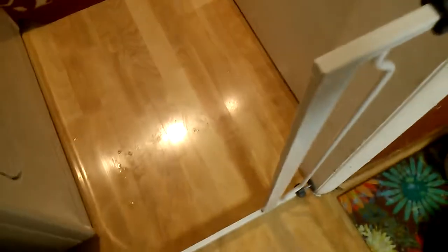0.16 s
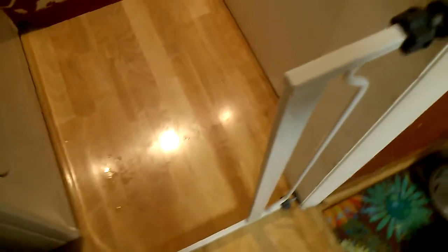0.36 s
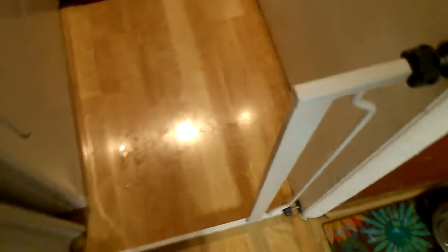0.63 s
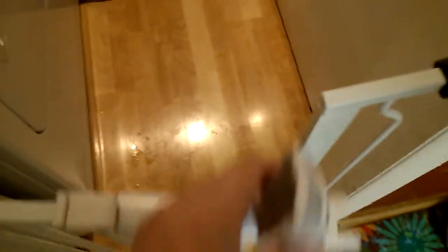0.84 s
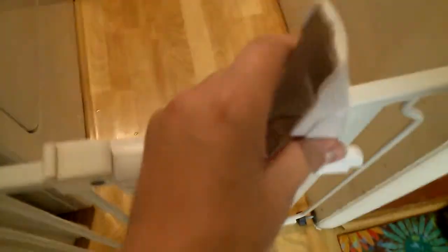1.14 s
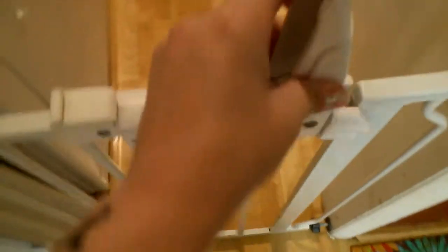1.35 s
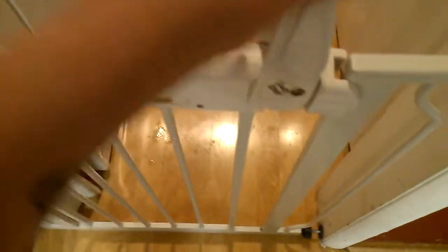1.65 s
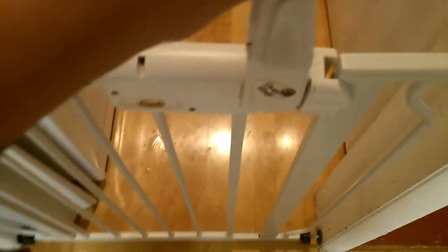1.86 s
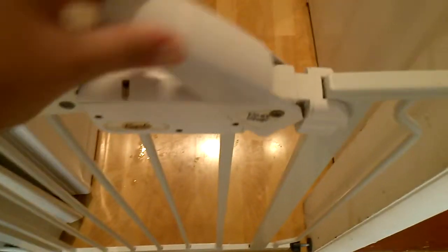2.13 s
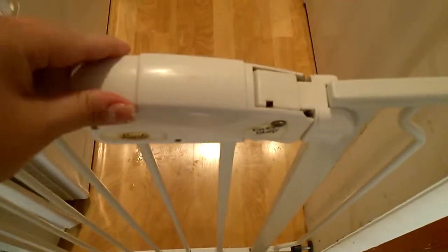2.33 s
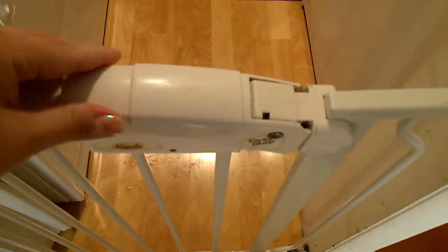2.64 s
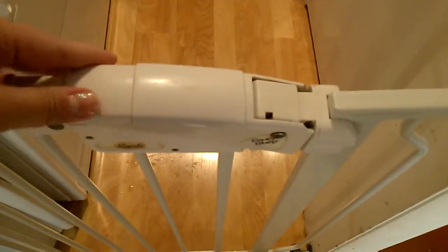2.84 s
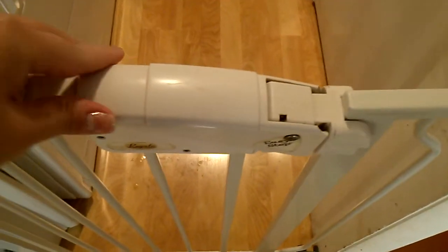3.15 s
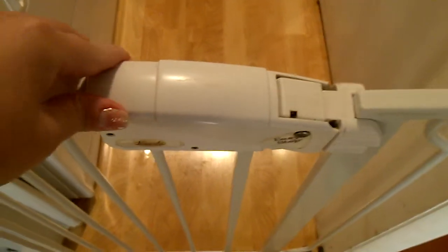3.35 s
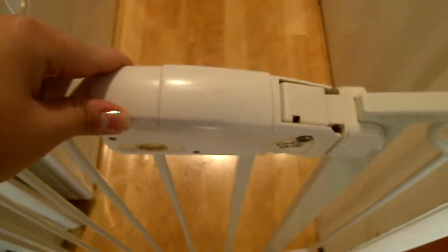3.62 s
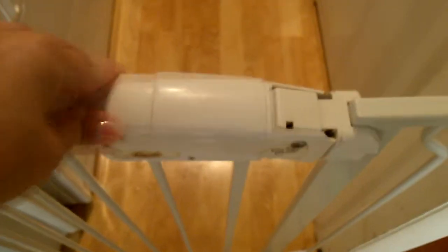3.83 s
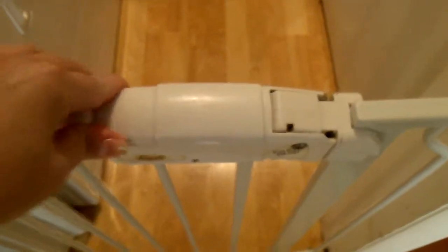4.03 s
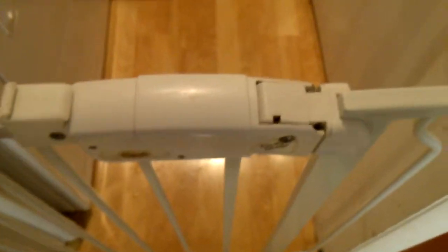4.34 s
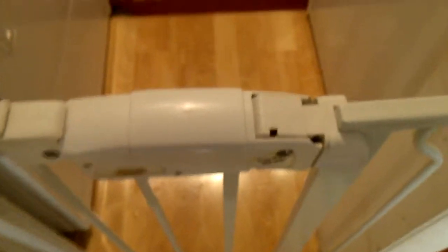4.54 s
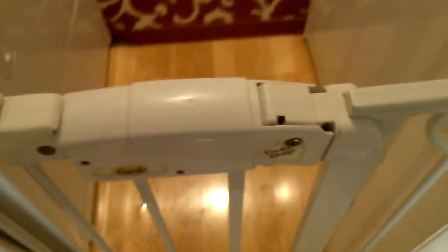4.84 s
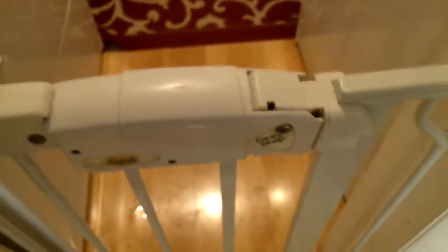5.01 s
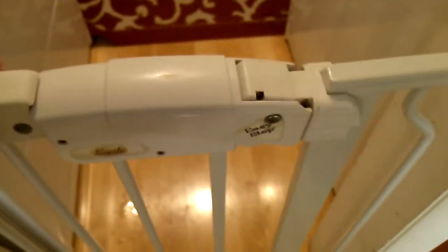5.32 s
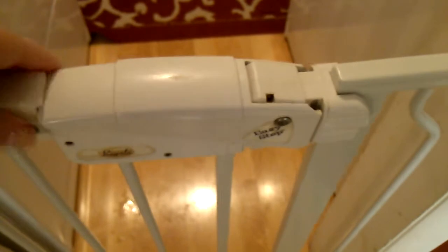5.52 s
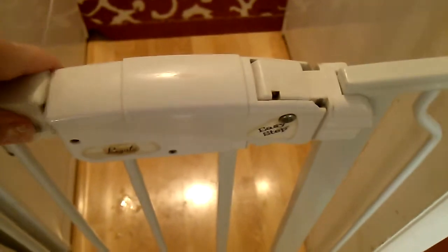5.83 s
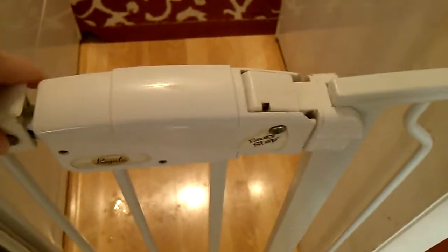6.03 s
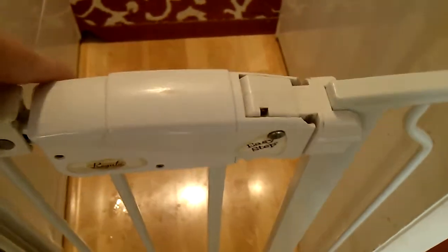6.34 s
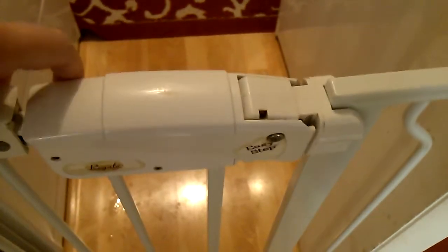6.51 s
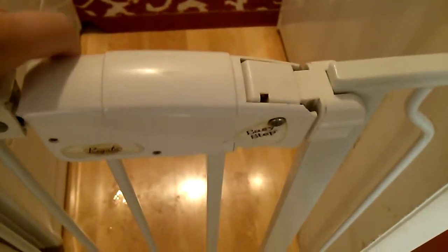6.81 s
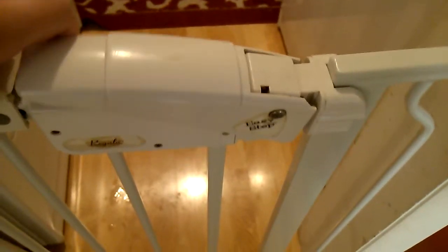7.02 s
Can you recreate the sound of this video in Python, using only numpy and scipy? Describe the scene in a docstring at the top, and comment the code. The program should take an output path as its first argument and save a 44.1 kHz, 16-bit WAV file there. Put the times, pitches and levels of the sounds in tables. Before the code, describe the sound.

Close to a phone microphone in a hallway, a safety gate rattles shut in a burst of hard plastic cracks and short metallic rings. Separate clacks follow as the handle is worked, then one loud, rasping snap shakes the frame. After a lull, the latch clicks and knocks unevenly, with a tiny squeak. A slight room echo trails each hit, and quiet hiss and electrical hum lie underneath.

```python
"""Baby gate in a hallway

A hand shuts the gate and works its plastic handle and latch, close to a phone. Each knock is a short
crack that rings the steel bars; rubbing and rattling parts do the same with dense ticks. The frame
shakes after heavier knocks and the latch squeaks. The hallway adds a short tail over hiss and mains hum."""
import sys
import numpy as np
from scipy import signal
from scipy.io import wavfile
from scipy.ndimage import uniform_filter1d

SR = 44100
rng = np.random.default_rng(int(sys.argv[2]) if len(sys.argv) > 2 else 0)


def log_audio(samples):
    """Write samples as a 16-bit WAV file to the path given in sys.argv[1]."""
    # one column per channel
    frames = np.atleast_2d(samples).T
    # limit to full scale, then quantise
    limited = np.clip(frames, -1, 1)
    pcm = np.round(limited * 32767).astype(np.int16)
    wavfile.write(sys.argv[1], SR, pcm)


N = 316197

# modes of the steel bars and housing: pitch_hz, level_db, free_t60_s
GATE_MODES = [(680, -29, .1), (816, -6, .13), (867, -14.5, 0.11), (1090, -3, 0.033), (1482, 5, 0.16),
              (1768, 0, 0.11), (1890, -28.5, .16), (2200, -22.5, 0.18), (2177, 1.5, 0.54), (2182, 0, 0.49),
              (2270, -14, 0.73), (2550, -27.5, 0.39), (2370, 7.5, 0.22), (2590, -8, 1), (2810, 9, 0.23),
              (2790, -3.5, 0.11), (3020, -10, 0.64), (3260, -48, 0.12), (3370, -32, .3), (3760, -44, 0.27),
              (3995, -1.5, 0.11), (4480, -4, 0.15), (4640, -21, 0.13), (5220, -23, 0.14),
              (6090, -0.5, 0.27), (5935, -17, 0.18), (5800, -12, 0.2), (6000, -17, .13)]
MODE_HZ = np.transpose(GATE_MODES)[0]
HOUSING_MODES = MODE_HZ < 1300


def amp(db):
    return 10 ** (np.asarray(db) / 20)


def unit_rms(x):
    return x / np.sqrt(np.mean(x ** 2) + 1e-20)


def unit_peak(x):
    return x / abs(x).max()


def curve_at(points, hz):
    point_hz, value = np.transpose(points)
    return np.interp(np.log(hz + 1), np.log(point_hz + 1), value)


def add(mix, start_s, sound):
    part = mix[round(start_s * SR):][:len(sound)]
    part += sound[:len(part)]


def band(x, lo_hz, hi_hz):
    return signal.sosfilt(signal.butter(2, [lo_hz, hi_hz], "band", fs=SR, output="sos"), x)


def resonate(x, hz, width_hz):
    """One complex pole, unity gain at resonance."""
    radius = np.exp(-np.pi * width_hz / SR)
    return 2 * signal.lfilter([1 - radius], [1, -radius * np.exp(2j * np.pi * hz / SR)], x).real


def room_tone():
    """Hiss with faint drifting patches, plus wavering mains hum."""
    # hiss spectrum: freq_hz, density_db
    hiss_spectrum = [(15, -64), (25, -29), (52, -1), (124, -6.5), (147, 0), (182, -11), (323, -9),
                     (356, -11.5), (534, -12), (862, -11.5), (2470, -19.5), (3290, -19), (6740, -29.5),
                     (7600, -25), (9880, -58), (16700, -120)]
    # hiss envelope: time_s, level_db
    hiss_envelope = [(0, -50), (1.2, -46.5), (2.3, -45.5), (2.7, -50.5), (3.8, -49), (4.6, -49.5),
                     (5.4, -50.5), (6.1, -50), (7.17, -49)]
    # mains hum: pitch_hz, level_db, waver_ratio
    mains = (119.5, -59.5, 0.36)
    hum_hz, hum_db, waver_ratio = mains
    t, bin_hz = np.arange(N) / SR, np.fft.rfftfreq(1024, 1 / SR)
    real, imag, patches = rng.standard_normal((N // 256 + 5, 513, 3)).T
    patch_db = 1.6 * unit_rms(uniform_filter1d(uniform_filter1d(patches, 14, 0), 12, 1))
    spectra = (real + 1j * imag) * amp(curve_at(hiss_spectrum, bin_hz)[:, None] + patch_db)
    hiss = signal.istft(spectra, nperseg=1024, noverlap=768)[1][:N]
    hiss_db = np.interp(t, *np.transpose(hiss_envelope)) - 0.5
    waver = unit_rms(resonate(rng.standard_normal(N), hum_hz, width_hz=5.1))
    hum = np.sin(2 * np.pi * hum_hz * t) + waver_ratio * waver
    return amp(hiss_db) * unit_rms(hiss) + amp(hum_db) * unit_rms(hum)


def bars(weights_db, t60_scale, length_s=.3):
    """Tap response of three nearly alike bars, modes weighted by where the tap lands."""
    hz, db, t60_s = np.float32(GATE_MODES).T[:, :, None]
    t = np.arange(round(length_s * SR), dtype=np.float32) / SR
    phase = 2 * np.pi * hz * t
    detuned = sum(np.sin(phase * np.float32(1 + 0.018 * rng.standard_normal(hz.shape))) for _ in range(2))
    decay = np.exp(-6.9078 * t / (t60_s * t60_scale))
    return unit_peak(amp(db[:, 0] + weights_db) @ (decay * (np.sin(phase) + 1.65 * detuned)))


def knocks():
    """A crack in three bands with two plastic tones; its onset rings the bars."""
    # blows: start_s, level_db, pitch_hz, edge_hz, hollow_db, edge_db, ring_db (last three re level_db)
    blows = [(0.4018, -47.5, 1220, 3970, -9, 13, -14), (0.481, -40.5, 2210, 3760, -12, 2.5, -3),
             (0.587, -27, 3250, 3600, -33, 1.5, -25), (0.815, -32, 2940, 5200, -8, -3, -5),
             (1.0515, -36.5, 1190, 6100, -16, 4, -4), (1.1389, -7, 2330, 3950, -8.5, 3, -11),
             (1.1469, -6, 1550, 4300, -3.5, -31, -16), (1.1974, -29.5, 2140, 5580, 11, -8, -9),
             (1.228, -7.5, 2290, 4180, -5.5, -9.5, -17), (1.2843, -21.5, 1300, 4430, -7, 3, -3),
             (1.3232, -24.5, 1420, 3860, 3.5, -5, -7), (1.339, -36, 1860, 6200, 9, 10, 1),
             (1.3718, -5.5, 2130, 5120, -3, 9, 3), (1.3844, -4, 2170, 5070, -13, -14, -2.5),
             (1.402, -6.5, 2200, 6020, -11, -23, -15), (1.423, -7, 2110, 6000, -0.5, 5, -19),
             (1.4355, -6, 2140, 6160, -9.5, -16, -10), (1.4524, -11.5, 2150, 3580, -10, -7, -4),
             (1.8693, -26.5, 2240, 5960, -1, 6.5, 1), (1.8862, -14.5, 2010, 3820, -4, -2.5, -3),
             (2.15, -30, 2070, 3850, -23, -4, -22), (2.3519, -1, 2870, 4260, -17.5, 1, -3),
             (2.362, -9.5, 2750, 4300, -11.5, 0, -13), (2.7835, -43.5, 1470, 3440, 10.5, -1, -16),
             (3.0758, -32.5, 2360, 5680, 5, -5, -3), (3.0872, -30, 1770, 3740, 9, -8, -10),
             (3.2558, -14, 2240, 3400, -15.5, -6.5, -2), (3.2875, -34.5, 2820, 3670, 10, -22, -17),
             (3.4488, -42.5, 1410, 5350, -18, 1, 0), (3.563, -45, 1230, 3990, 2, -1, -6),
             (3.608, -35, 1250, 6670, 8, -5, -11), (3.6552, -37.5, 1430, 4080, 3, -17, -4),
             (3.7022, -27, 1460, 3660, 1, -18, -6), (3.7177, -29.5, 1480, 3700, 11, 1.5, -1),
             (3.7965, -46, 2170, 3960, -14, -20, 6), (3.9027, 4, 2650, 4200, -11, 0, -7),
             (4.4214, -46, 2150, 5730, 6, 5.5, 5), (4.4633, -45, 2150, 5440, -13, 3, -4),
             (4.6117, -37.5, 2140, 5820, -11, 4.5, -22), (5.1045, -50.5, 2930, 5970, -12, 12.5, 0),
             (5.4269, -29, 2400, 5530, 2, -4, -1.5), (5.5448, -33.5, 1280, 6240, -14, 0, -11),
             (5.6051, -28, 1800, 4010, -0.5, -21, -19), (5.7028, -21, 2330, 3360, -30, 6.5, 8),
             (5.7131, -15.5, 2360, 6060, -14, 2, 2.5), (5.7589, -25, 2330, 6000, 0.5, -2, 2),
             (5.803, -27, 1990, 3820, 4, -16, -6), (5.8574, -35, 2150, 3500, -1.5, -18, -11),
             (5.9045, -31, 1350, 5700, -17, -0.5, 1), (5.9178, -23, 1710, 5770, -0.5, 1, -8),
             (5.946, -17, 2550, 3500, -33, 0.5, -8), (5.9889, -21, 1230, 3860, -1, -3.5, -21),
             (6.0163, -20.5, 1230, 5710, -18, -8, -17), (6.0804, -13.5, 2850, 3300, -8.5, -3, -2.5),
             (6.0872, -17, 2260, 5800, -8, -4.5, 4), (6.3079, -34, 2240, 4160, -4.5, -8, 6),
             (6.4278, -41.5, 2330, 3750, -26, -9, 7.5), (6.552, -15, 1440, 5630, -8, -5, -14),
             (6.5754, -23.5, 1500, 4000, -0.5, -19, -12), (6.8219, -24, 1430, 3500, -10, -12, -18),
             (6.8614, -27.5, 2660, 3670, -7, 2, -15), (6.8914, -10.5, 1470, 3720, -11, -13, -12),
             (6.955, -38, 1460, 3700, -5, -2, -8), (7.0695, -46.5, 1250, 4000, 11, 9, -16),
             (7.1187, -37, 1490, 3430, -4.5, -2, -5)]
    # air in the plastic housing: pitch_hz, width_hz, level_db
    air_modes = [(775, 116, 1.5), (449, 65, -5)]
    rise_s, spike_gain, push_samples = .0016, 1.81, 400
    out, t = np.zeros(N), np.arange(4096) / SR
    for start_s, level_db, pitch_hz, edge_hz, hollow_db, edge_db, ring_db in blows:
        burst = rng.standard_normal(len(t)) * (1 - np.exp(-t / rise_s))
        burst += spike_gain * signal.unit_impulse(len(t))
        crack_t60_s = .045 * amp(0.33 * ring_db)  # more ring, longer crack
        crack = burst * amp(-60 * t / crack_t60_s)
        tock = unit_peak(band(crack, 910, 3840) + 3.8 * resonate(crack, pitch_hz, 360))
        edge = unit_peak(band(crack, 3250, 13400) + 2.2 * resonate(crack, edge_hz, 270))
        dull = band(burst * amp(-60 * t / 0.061), 400, 1520)
        air = sum(amp(db) * resonate(dull, hz, width_hz) for hz, width_hz, db in air_modes)
        hollow = unit_peak(dull + air)
        add(out, start_s, amp(level_db) * (tock + amp(hollow_db) * hollow + amp(edge_db) * edge))

        # the struck place favours modes near its two pitches
        near_pitch = amp(-40 * abs(np.log2(MODE_HZ / pitch_hz)))
        near_edge = amp(edge_db - 4.5 - 60 * abs(np.log2(MODE_HZ / edge_hz)))
        weights_db = 20 * np.log10(near_pitch + near_edge + 0.34) + .5 * hollow_db * HOUSING_MODES
        weights_db += 2 * rng.standard_normal(len(MODE_HZ))
        onset = crack[:push_samples]
        push = 0.48 * onset / np.linalg.norm(onset) + signal.unit_impulse(push_samples)
        t60_scale = max(.7 - .033 * max(level_db + 15, 0), .1)  # harder blows are gripped harder
        ring = signal.fftconvolve(push, bars(weights_db, t60_scale, length_s=.22))
        add(out, start_s, amp(level_db + ring_db) * unit_peak(ring))
    return out


def rubs():
    """Dense uneven ticks, heard directly, through the rubbed part and through the bars."""
    # strokes: start_s, length_s, first_db, last_db, pitch_hz, hollow_db, edge_db, ring_db
    # (last three re stroke level)
    strokes = [(0.805, 0.46, -46, -54, 2410, -4, 3, 1), (1.7, 0.22, -51, -49, 2240, -6, 8.5, 2),
               (1.94, 0.24, -42, -44.5, 2170, -14, 1.5, 10), (2.21, 0.18, -46.5, -37, 1720, 2, 1, 11),
               (3.5, 0.066, -55, -47, 2100, 4, -10, 5), (3.609, .02, -47, -55, 1960, 17, -4, 9),
               (3.905, 0.097, -9.5, -13.5, 2400, 2, -6, 2), (5.545, .04, -47, -52, 1650, 11, -4, 5),
               (5.915, 0.035, -24.5, -30.5, 2200, 2, -3, 3), (6.012, 0.019, -24, -35.5, 2230, 6.5, -14, 5)]
    ticks_per_s, rise_s, fade_db_per_s, bars_db = 5000, .01, 199.5, -18
    out, t = np.zeros(N), np.arange(SR // 2) / SR
    for start_s, length_s, first_db, last_db, pitch_hz, hollow_db, edge_db, ring_db in strokes:
        level_db = np.interp(t, [0, length_s], [first_db, last_db])
        level_db -= fade_db_per_s * np.maximum(t - length_s, 0)
        ticks = rng.standard_normal(len(t)) * amp(1.3 * rng.exponential(1, len(t)))
        ticks *= rng.random(len(t)) < ticks_per_s / SR
        ticks = unit_rms(ticks) * amp(level_db) * np.minimum(t / rise_s, 1)
        hollow = amp(hollow_db) * band(ticks, 370, 1900)
        edge = amp(edge_db) * band(ticks, 2710, 8300)
        part_tone = amp(ring_db) * resonate(ticks, pitch_hz, 140)
        add(out, start_s, band(ticks, 1350, 4080) + hollow + edge + part_tone)
        # light ticks hardly move the housing
        ring = bars(-9 * HOUSING_MODES - 22 * abs(np.log2(MODE_HZ / pitch_hz)), t60_scale=0.55)
        add(out, start_s, amp(ring_db + bars_db) * signal.fftconvolve(ticks, ring / np.linalg.norm(ring)))
    return out


def frame_thuds():
    """The frame shakes after heavier knocks: low noise that swells and dies."""
    # frame shakes: start_s, peak_db, rise_s
    shakes = [(1.14, -29.5, .01), (1.228, -33.5, .01), (1.32, -36, 0.0055), (1.372, -27, 0.0087),
              (1.423, -27, 0.018), (1.875, -36, 0.012), (2.352, -34.5, 0.0033), (2.8, -49, 0.012),
              (3.081, -41, 0.0091), (3.256, -38, 0.0074), (3.92, -25, 0.09), (5.43, -44.5, .01),
              (5.713, -40, 0.013), (5.803, -34.5, .01), (5.92, -38.5, .01), (6.087, -38.5, 0.015),
              (6.552, -35.5, .015), (6.891, -47, .005)]
    t60_s = .37
    out, t = np.zeros(N), np.arange(SR // 3) / SR
    for start_s, peak_db, rise_s in shakes:
        shake = rng.standard_normal(len(t)) * (1 - np.exp(-t / rise_s)) * amp(-60 * t / t60_s)
        add(out, start_s, amp(peak_db) * unit_peak(band(band(shake, 95, 313), 76, 420)))
    return out


def latch_squeaks():
    """Thin, fuzzy whistles of narrowband noise."""
    # squeaks: start_s, length_s, pitch_hz, level_db
    squeaks = [(3.546, 0.028, 6820, -60), (3.592, 0.042, 6820, -52.5), (3.595, 0.068, 7300, -62),
               (4.353, 0.062, 3340, -63), (5.545, 0.059, 3460, -52)]
    out, width_hz = np.zeros(N), 120
    for start_s, length_s, pitch_hz, level_db in squeaks:
        narrow = resonate(rng.standard_normal(8192), pitch_hz, width_hz)
        whistle = resonate(narrow, pitch_hz, width_hz)[:round(length_s * SR)]
        add(out, start_s, amp(level_db) * unit_rms(whistle) * signal.windows.tukey(len(whistle), .3))
    return out


def hallway(x):
    """Sparse reflections of random sign, each band dying at its own rate; three tails crossfade."""
    # hallway decay: freq_hz, t60_s
    decay_times = [(100, 0.91), (300, 0.23), (700, 0.44), (1840, 0.34), (4850, 0.42), (8000, 0.32)]
    turns_per_s, slot_samples = 7, 16
    out, turn = np.zeros(N), np.arange(N) / SR * turns_per_s
    slots = np.arange(200, SR - 20, slot_samples)
    for k in range(3):
        taps = np.zeros(SR)
        taps[slots + rng.integers(0, slot_samples, len(slots))] = rng.choice([-1., 1.], len(slots))
        hz, t, spectra = signal.stft(taps, SR, nperseg=256)
        decay = amp(-60 * t / curve_at(decay_times, hz)[:, None])
        tail = signal.istft(spectra * decay, SR, nperseg=256)[1]
        share = np.cos(np.pi * (turn + k) / 3) * np.sqrt(2 / 3)
        out += signal.oaconvolve(x * share, tail / np.linalg.norm(tail))[:N]
    return out


def scene():
    """Gate, hallway tail and room tone; mono."""
    hallway_db = -5.5
    gate = knocks() + frame_thuds() + rubs() + latch_squeaks()
    return (gate + amp(hallway_db) * hallway(gate) + room_tone())[None]


def record(dry):
    """Phone: a limiter holds loud blows down, a low sample rate mirrors the treble, peaks clip."""
    # phone response: freq_hz, gain_db
    response = [(20, 0.5), (6500, 2.5), (7200, -5), (7700, -13), (8000, -24), (8300, -16.5), (9200, -19),
                (10000, -36), (10500, -89.5)]
    limit_db, release_db_per_s, clip_level = -8, 200, .97
    phone_rate_hz, cutoff_hz = 16000, 16000
    t, hz = np.arange(N) / SR, np.linspace(0, SR / 2, 1025)
    level_db = 10 * np.log10(abs(signal.lfilter(np.ones(90) / 90, 1, dry ** 2)) + 1e-12)
    release_db = release_db_per_s * t
    held_db = np.maximum.accumulate(level_db + release_db, axis=1) - release_db
    limited = dry / amp(np.maximum(held_db - limit_db, 0))
    baseband = signal.oaconvolve(limited, signal.firwin(511, phone_rate_hz / 2, fs=SR)[None], "same")
    mirrored = baseband * (1 + 2 * np.cos(2 * np.pi * phone_rate_hz * t))
    response_fir = signal.firwin2(1023, hz, amp(curve_at(response, hz)), fs=SR)
    shaped = signal.oaconvolve(mirrored, response_fir[None], "same")
    shaped = signal.sosfilt(signal.butter(4, 42, "high", fs=SR, output="sos"), shaped)
    clipped = shaped / (1 + abs(shaped / clip_level) ** 14) ** (1 / 14)
    lowpass_fir = signal.firwin(511, cutoff_hz, window=("kaiser", 9), fs=SR)
    return signal.oaconvolve(clipped, lowpass_fir[None], "same")


dry = scene()
out = record(dry)
log_audio(out)
```